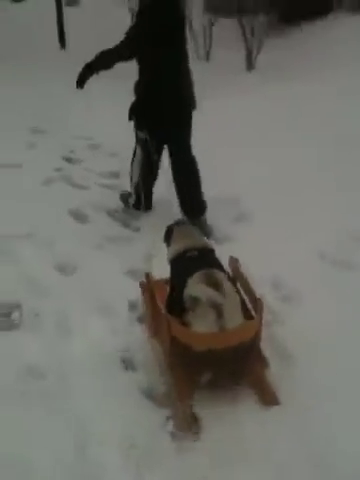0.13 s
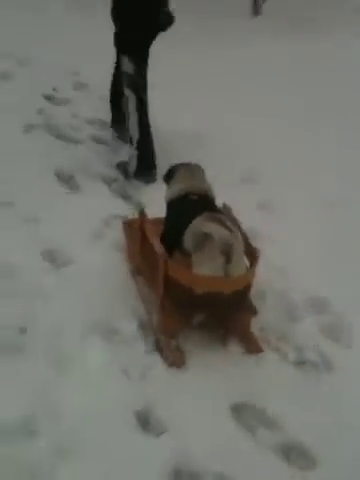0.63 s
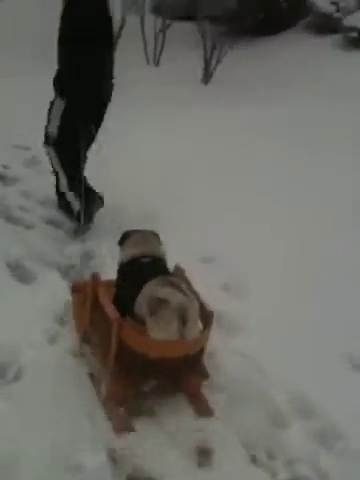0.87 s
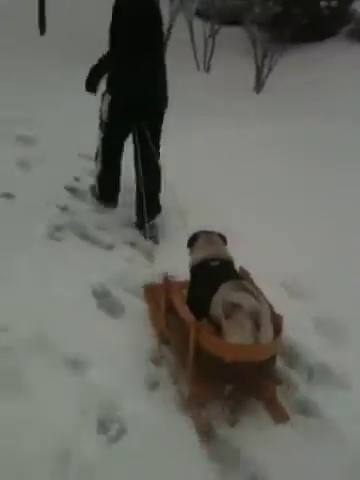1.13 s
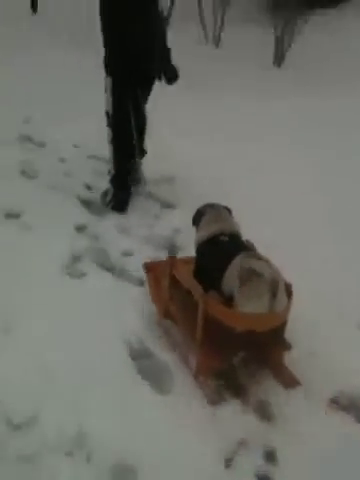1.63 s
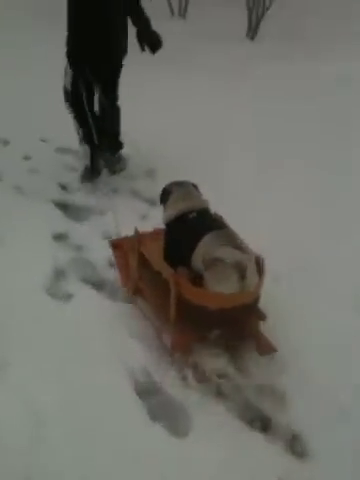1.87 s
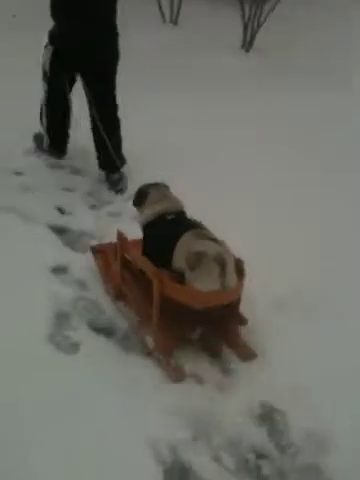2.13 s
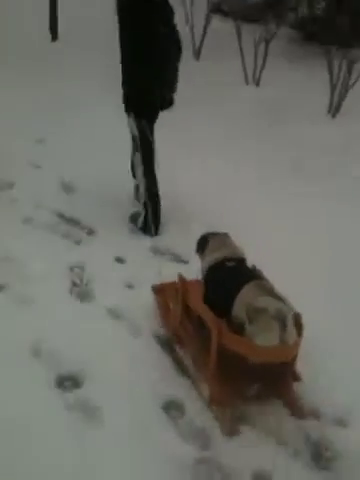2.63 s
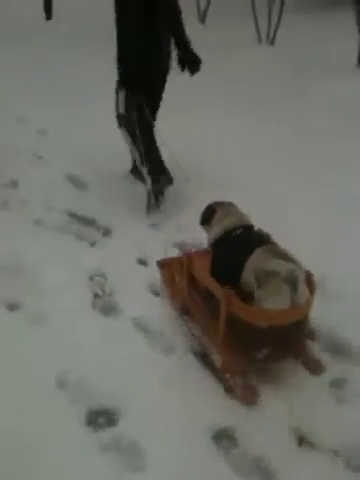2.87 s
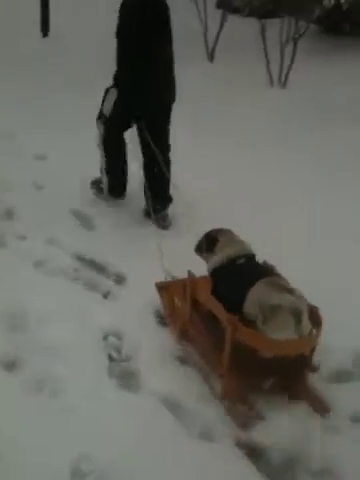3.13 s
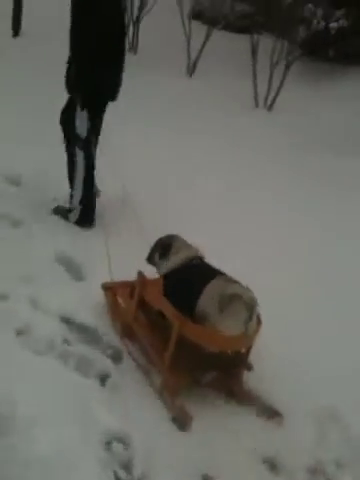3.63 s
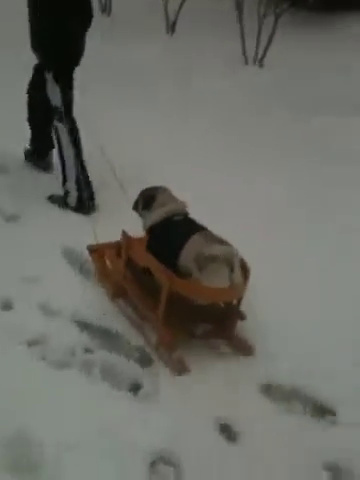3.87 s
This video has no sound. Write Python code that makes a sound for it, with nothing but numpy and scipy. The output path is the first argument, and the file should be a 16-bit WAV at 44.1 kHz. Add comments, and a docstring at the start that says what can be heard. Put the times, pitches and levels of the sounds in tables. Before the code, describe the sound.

Steady snow footsteps, each a dull thud with crackle and fizz, alternate with soft cloth swishes over a dragged sled's uneven scraping; its rasp swells midway, then fades. Close, outdoors, no echo, light wind.

```python
"""Boots crunch through snow close by, twice a second; trouser legs swish between the steps.
A wooden sled hisses over the snow, ice crumbs tick, packed snow knocks softly, and a light breeze lies under it all.
Boots, cloth and sled are filtered random grains under envelopes; the sled also excites resonances.
Ticks and knocks are decaying sines; the breeze is filtered noise. Open air, no echo."""
import sys
import numpy as np
from scipy import signal
from scipy.fft import rfft, irfft
from scipy.io import wavfile
from scipy.ndimage import uniform_filter1d

SR = 44100
rng = np.random.default_rng(int(sys.argv[2]) if len(sys.argv) > 2 else 0)


def output_pcm(signal):
    """Save a mono or channel-first signal as 16-bit PCM at the path in sys.argv[1].

    Samples are clipped to [-1, 1] before scaling.
    """
    pcm = np.clip(np.atleast_2d(signal).T, -1, 1) * 32767
    wavfile.write(sys.argv[1], SR, np.round(pcm).astype(np.int16))


def field_ratio(decibels):
    """Amplitude ratio for a level in dB (20 dB per decade); scalars and array-likes work."""
    return 10 ** (np.asarray(decibels, dtype=float) / 20)


N = 176400  # 4 s

SWISH_PIVOT_HZ = 7000  # a spectral tilt is 0 dB here


def evened(x):
    """Normalisation: scales a signal to rms 1."""
    return x / np.sqrt(np.mean(x ** 2) + 1e-20)


def colour(x, points, tilt_db=0):
    """Minimum-phase filtering: the log spectrum alone fixes a causal response, here of unit energy."""
    hz = np.abs(np.fft.fftfreq(4096, 1 / SR)) + 1
    f, db = np.transpose(points)
    level_db = np.interp(np.log(hz), np.log(f), db) + tilt_db * np.log2(hz / SWISH_PIVOT_HZ)
    log_gain = np.log(field_ratio(np.maximum(level_db, -100)))
    # the Hilbert transform of the log gain gives the phase
    spectrum = np.exp(np.conj(signal.hilbert(log_gain)))
    taps = np.fft.ifft(spectrum).real
    return signal.oaconvolve(x, taps / np.linalg.norm(taps))[:len(x)]


def resonate(x, hz, width):
    """Resonance by heterodyning: shift hz to zero, low-pass with a double pole, shift back; hz may vary."""
    r = np.exp(-np.pi * width / SR)
    turn = np.exp(2j * np.pi * np.cumsum(hz * np.ones(len(x))) / SR)
    slow_part = signal.lfilter([(1 - r) ** 2], [1, -2 * r, r * r], x / turn)
    # the gain keeps white noise of rms 1 near rms 1
    return np.sqrt(2 * SR / np.pi / width) * (turn * slow_part).real


def grains(per_s, spread_db, smooth):
    """Shot noise of breaking crystals: random clicks, a few large, mixed by power with smooth noise."""
    hit = rng.random(N) < per_s / SR
    size = np.minimum(rng.exponential(1, N), 3)
    sign = np.sign(rng.standard_normal(N))
    clicks = hit * sign * field_ratio(spread_db * size)
    return np.sqrt(1 - smooth) * evened(clicks) + np.sqrt(smooth) * rng.standard_normal(N)


def slow(rate):
    """Band-limited random modulation: noise low-passed near rate (Hz), rms 1."""
    hz = np.fft.rfftfreq(N, 1 / SR)
    return evened(irfft(rfft(rng.standard_normal(N)) / (1 + (hz / rate) ** 4), N))


def blows(table, ring):
    """Superposition of impulse responses: one short ring per row, scaled to its peak level."""
    out, t = np.zeros(N + 6000), np.arange(6000) / SR
    for s, db, hz in table:
        one = ring(t, hz) * np.sin(2 * np.pi * hz * t)
        out[round(s * SR):][:len(t)] += field_ratio(db) * one / np.abs(one).max()
    return out[:N]


# spectrum of the thin wide wash: f/Hz, relative level/dB
WASH_SPECTRUM = [(25, -39), (59, -54), (153, -34), (223, -48), (373, 2), (2350, 5.5), (3340, 0), (7110, 2),
                 (13200, -31), (16600, -31)]
# spectrum of the low buffets on the microphone: f/Hz, relative level/dB
BUFFET_SPECTRUM = [(20, 7), (60, -27), (100, -16.5), (160, -4), (220, -2), (400, -11.5), (800, -11),
                   (1600, -19.5)]


def breeze():
    """Turbulence noise: a nearly steady wide wash, and lumpy low buffets on the microphone."""
    wash_level = field_ratio(-52 + 0.37 * slow(0.61))
    wash = wash_level * colour(rng.standard_normal(N), WASH_SPECTRUM)
    buffet_level = field_ratio(-53.5 + 5.5 * slow(28))
    return wash + colour(buffet_level * rng.standard_normal(N), BUFFET_SPECTRUM)


# soft low knocks through the packed snow: t/s, peak level/dB, f/Hz
SNOW_KNOCKS = [(0.040, -26, 204), (0.096, -37, 220), (0.195, -43, 145), (0.372, -40, 180),
               (0.513, -25.5, 192), (0.541, -35, 149), (0.662, -37, 163), (0.835, -37, 224),
               (0.898, -44.5, 298), (0.944, -46, 257), (1.027, -39, 383), (1.067, -29, 271),
               (1.098, -41, 337), (1.535, -36, 310), (1.571, -35.5, 295), (1.582, -33.5, 167),
               (1.598, -33, 188), (1.755, -41.5, 243), (1.928, -43.5, 350), (2.019, -42, 315),
               (2.053, -37, 194), (2.190, -37, 190), (2.207, -42, 163), (2.428, -37, 217),
               (2.505, -31.5, 320), (2.746, -36.5, 195), (2.757, -37, 174), (2.986, -42.5, 168),
               (2.998, -54, 191), (3.29, -40.5, 196), (3.376, -42, 200), (3.445, -34, 404),
               (3.634, -41, 191), (3.899, -39.5, 203)]


def knocks():
    """Damped oscillation of the snow pack: a short dull ring with a softened onset."""
    rise_s, t60_s = 0.004, 0.055

    def envelope(t, hz):
        return (1 - np.exp(-t / rise_s)) * field_ratio(-60 * t / t60_s)

    return blows(SNOW_KNOCKS, envelope)


# ticks of ice crumbs: t/s, peak level/dB, f/Hz
CRUMB_TICKS = [(.0368, -15, 1220), (.1655, -36, 4340), (.4885, -35, 4220), (.5165, -18, 1360),
               (.5445, -23, 1800), (.5672, -27, 7700), (.8322, -17.5, 5040), (.8345, -23, 3540),
               (.8975, -22, 8100), (1.0182, -20, 1260), (1.030, -24, 1660), (1.058, -20.5, 1670),
               (1.2088, -25, 4770), (1.495, -31, 1550), (1.5392, -26.5, 1470), (1.5468, -21, 1250),
               (1.5705, -25, 1410), (1.600, -28, 1300), (1.671, -28, 5160), (1.7752, -28, 5040),
               (2.0152, -20, 1470), (2.0318, -26, 1830), (2.0798, -21, 7500), (2.146, -27, 4370),
               (2.4685, -25, 5300), (2.5178, -14.5, 2190), (2.5674, -21, 5850), (2.618, -28, 7430),
               (2.7318, -22.5, 5430), (2.8715, -26, 3930), (2.9558, -31, 3470), (2.9722, -17, 7950),
               (3.2436, -28, 5660), (3.3878, -24, 8000), (3.4525, -29, 1240), (3.7945, -27, 6270),
               (3.8185, -25, 6480), (3.8538, -24, 8750), (3.903, -29.5, 1060)]


def ticks():
    """Heavy damping: each crumb's click dies within a few cycles of its pitch."""
    decay_cycles, rise_s = 2.1, 0.00006
    lump_hz = 3000  # larger lumps, pitched under this, ring for fewer cycles

    def envelope(t, hz):
        return np.minimum(t / rise_s, 1) * np.exp(-max(hz, lump_hz) * t / decay_cycles)

    return blows(CRUMB_TICKS, envelope)


# course of the sliding: t/s, mean rasp level/dB, rasp f/Hz, mean scrape level/dB (drives ring and hiss)
SLIDE_COURSE = [(0, -46, 2200, -53), (.22, -54, 2270, -54), (.34, -45, 2260, -49.5),
                (.48, -46.5, 2350, -50.5), (.7, -44.5, 2420, -44.5), (.95, -43.5, 2440, -49),
                (1.2, -43.5, 2570, -50.5), (1.34, -50, 2420, -49), (1.42, -49, 2520, -44),
                (1.55, -45, 2460, -58), (1.62, -42, 2580, -50), (1.72, -41.5, 2460, -47),
                (1.86, -38.5, 2520, -43), (1.97, -50, 2410, -51), (2.12, -45, 2470, -46),
                (2.16, -38.5, 2380, -45), (2.22, -33.5, 2600, -44.5), (2.29, -35.5, 2600, -43.5),
                (2.38, -39.5, 2440, -45.5), (2.45, -43.5, 2570, -45.5), (2.64, -50, 2410, -51.5),
                (2.75, -43, 2320, -43), (2.98, -42, 2450, -44), (3.15, -55, 2360, -56),
                (3.35, -49, 2120, -47), (3.52, -48, 2280, -44.5), (3.68, -47, 2210, -49.5),
                (3.85, -58, 2200, -48.5), (4, -59, 2300, -61)]
# wood ring and fine hiss of the runners: f/Hz, width/Hz, level relative to the scrape/dB
RUNNER_BANDS = [(900, 1020, -0.5), (1515, 530, -0.5), (4780, 3200, 3), (7460, 3760, -0.5),
                (10450, 5100, -8)]


def sled():
    """Friction-excited resonance: sliding grain rasps in a drifting band and rings the wooden runners."""
    t = np.arange(N) / SR
    times, *columns = np.transpose(SLIDE_COURSE)
    rasp_db, rasp_hz, scrape_db = (np.interp(t, times, column) for column in columns)
    rasp = grains(per_s=1500, spread_db=3.5, smooth=0.4) * field_ratio(rasp_db + 2.0 * slow(70))
    scrape = grains(per_s=2500, spread_db=4.0, smooth=0.35) * field_ratio(scrape_db + 2.0 * slow(27))
    out = resonate(rasp, rasp_hz, width=900)  # the rasp pitch drifts with the load
    for f, width, db in RUNNER_BANDS:
        out += field_ratio(db) * resonate(scrape, f, width)
    return out


# cloth and loose snow as a leg swings: middle t/s, level/dB, half length/s, tilt/(dB per octave)
LEG_SWISHES = [(0.126, -44.5, 0.041, -4), (0.256, -43, 0.035, 1), (0.372, -45.5, 0.021, -3),
               (0.682, -43, 0.033, -1.5), (0.758, -36.5, 0.022, 5.5), (0.839, -37.5, 0.022, 6),
               (0.994, -30.5, 0.019, -6), (1.155, -48, 0.092, 0.5), (1.254, -38, 0.043, 2),
               (1.482, -45.5, 0.038, 0), (1.643, -47, 0.048, 1), (1.768, -37.5, 0.04, 2),
               (1.857, -41, 0.023, 2.5), (2.078, -42, 0.045, 0), (2.228, -40.5, 0.081, 1),
               (2.619, -44, 0.011, 0), (2.706, -43.5, 0.063, -0.5), (2.772, -46.5, 0.045, 7),
               (2.872, -40.5, 0.0057, 2), (2.924, -35, 0.014, -5.5), (2.985, -39, 0.02, 1),
               (3.036, -44, 0.034, -4), (3.173, -46, 0.1, -4), (3.274, -47, 0.072, -0.5),
               (3.495, -41, 0.044, -3.5), (3.562, -43, 0.028, -5), (3.665, -39.5, 0.063, -4),
               (3.768, -42.5, 0.014, -3), (3.873, -46, 0.021, -1), (3.942, -35.5, 0.023, -5)]
# spectrum of the rubbing before its tilt: f/Hz, relative level/dB
RUB_SPECTRUM = [(880, -28.5), (1500, -2), (2060, -0.5), (3410, 1.5), (5000, 4.5), (6830, 5.5), (10800, 2),
                (14900, 1.5), (16600, -49)]


def legs():
    """Amplitude-modulated friction noise: soft bell-shaped swells of fine rubbing grain."""
    rub = grains(per_s=6500, spread_db=7, smooth=0.37) * field_ratio(1.14 * slow(110))
    out = np.zeros(N)
    for s, db, half, tilt_db in LEG_SWISHES:
        a = max(round((s - 5 * half) * SR), 0)
        b = min(round((s + 5 * half) * SR), N)
        bell = 1 / np.cosh(1.6 * (np.arange(a, b) / SR - s) / half)
        out[a:b] += colour(field_ratio(db) * bell * rub[a:b], RUB_SPECTRUM, tilt_db)
    return out


# snow under a boot: t/s, thud level/dB before the crest offset, crackle level re thud/dB,
# fizz level re thud/dB, time to the peak/s
BOOT_CRUNCHES = [(0.0221, -14, -0.5, -14, 0.015), (0.034, -20, 0, -0.5, 0.006),
                 (0.368, -45.5, 9.5, 1, 0.0091), (0.502, -22.5, -2.5, -7.5, 0.027),
                 (0.561, -30.5, 2.5, -2, 0.0063), (0.653, -28, -3, -11, 0.0077),
                 (0.83, -33.5, 2, -14, 0.003), (0.895, -41.5, 2, 5, 0.0063), (0.942, -37, 4.5, 1, 0.0042),
                 (1.006, -19, -0.5, -8.5, 0.027), (1.051, -25, -2.5, -3, 0.033),
                 (1.208, -32.5, 3, -7, 0.005), (1.523, -28, 0, -2, 0.023), (1.568, -32.5, -1, -2.5, 0.046),
                 (1.743, -32.5, 0.5, -7, 0.028), (2.0132, -17.5, 1, -7.5, 0.0027),
                 (2.03, -23.5, -1.5, -2.5, 0.0093), (2.187, -31, 0.5, -4, 0.033),
                 (2.499, -20.5, -0.5, 0, 0.0068), (2.553, -36, 0.5, 6, 0.029),
                 (2.715, -31.5, 1, 0.5, 0.036), (2.9532, -30.5, 1, -2.5, 0.039),
                 (3.243, -34.5, 1.5, 1.5, 0.016), (3.406, -35.5, 0.5, 3, 0.0088),
                 (3.447, -24, -2, -6.5, 0.019), (3.575, -32, -2.5, -19, 0.0038), (3.806, -35, -2, 3, 0.02),
                 (3.913, -28.5, -2.5, -2, 0.053), (3.973, -32.5, -1.5, 1.5, 0.018)]
# spectra of the three layers: f/Hz, relative level/dB
THUD_SPECTRUM = [(60, -43.5), (110, -12.5), (170, -2), (260, -2), (450, -1), (750, 3), (1200, -6),
                 (2500, -36.5)]
CRACKLE_SPECTRUM = [(300, -31.5), (700, 8), (1200, 7.5), (1700, 0.5), (2400, -1), (3300, -8.5),
                    (4500, -7.5), (8000, -15.5)]
FIZZ_SPECTRUM = [(1760, -44), (3000, -8.5), (5400, 2.5), (7150, 6), (9800, -3), (15000, -7.5), (16600, -20)]


def boots():
    """Fracture under load: each press bites, swells as the snow packs, then dies, in thud, crackle and fizz."""
    rise_s, t60_s = 0.0024, 0.16
    crest_db = -9  # offset on every level in the table
    first_touch_db = -1.5  # a press starts this far under its peak and swells
    t, power = np.arange(N) / SR, np.zeros((3, N))
    for s, thud_db, crackle_db, fizz_db, hold in BOOT_CRUNCHES:
        start = round(s * SR)
        u = t[start:][:SR // 2] - s
        swell_db = first_touch_db * np.clip(1 - u / hold, 0, 1)
        decay_db = -60 * np.maximum(u - hold, 0) / t60_s
        press = np.clip(u / rise_s, 0, 1) * field_ratio(thud_db + crest_db + swell_db + decay_db)
        for layer, rel_db in enumerate([0, crackle_db, fizz_db]):
            power[layer, start:][:SR // 2] += (press * field_ratio(rel_db)) ** 2
    flutter_db = [1.13 * slow(73), 1.3 * slow(260), 2.3 * slow(150)]
    thud_env, crackle_env, fizz_env = np.sqrt(power) * field_ratio(flutter_db)
    breaks = grains(per_s=1500, spread_db=4.2, smooth=0.38)  # shared by thud and crackle
    fine_breaks = grains(per_s=3300, spread_db=8, smooth=0.45)
    thud = colour(thud_env * breaks, THUD_SPECTRUM)
    crackle = colour(crackle_env * breaks, CRACKLE_SPECTRUM)
    return thud + crackle + colour(fizz_env * fine_breaks, FIZZ_SPECTRUM)


def patchy(x):
    """Time-varying spectral colour: each clump of snow is brighter or duller, about 1.5 kHz by 12 ms."""
    z = signal.stft(x, nperseg=256, noverlap=192)[2]
    field = rng.standard_normal(z.shape[::-1]).T
    field = uniform_filter1d(field, size=9, axis=0)  # along frequency
    field = uniform_filter1d(field, size=8, axis=1)  # along time
    patch_db = 2 * evened(field)
    return signal.istft(z * field_ratio(patch_db), nperseg=256, noverlap=192)[1][:N]


def scene():
    """Linear superposition: all sources add at one microphone."""
    snow = patchy(boots() + legs() + sled())
    return (snow + knocks() + ticks() + breeze())[None]


def top_cut(x):
    """Nothing passes above the cut-off."""
    return signal.sosfilt(signal.butter(12, 15950, fs=SR, output="sos"), x)


def record(dry):
    """Band limitation: a high-pass thins the deep bass; a low-pass ends the band at 15950 Hz."""
    bass_cut = signal.butter(3, 110, "highpass", fs=SR, output="sos")
    treble_cut = signal.firwin(511, 15950, window=("kaiser", 9), fs=SR)
    thin = signal.sosfilt(bass_cut, dry)
    mix = signal.oaconvolve(thin, treble_cut[None], "same")
    return top_cut(mix)


dry = scene()
out = record(dry)
output_pcm(out)
```